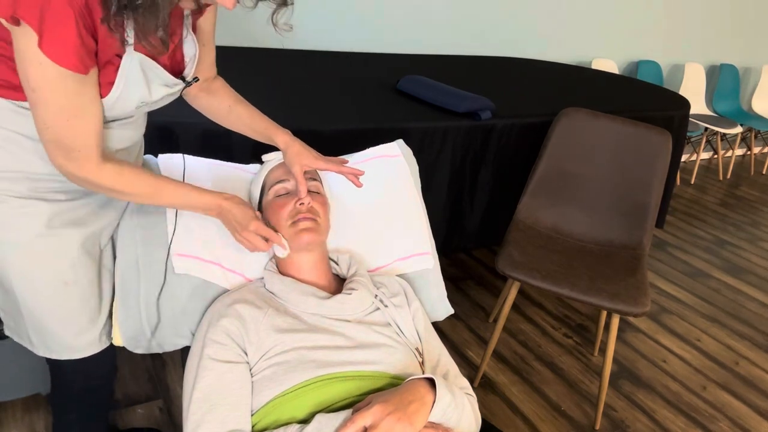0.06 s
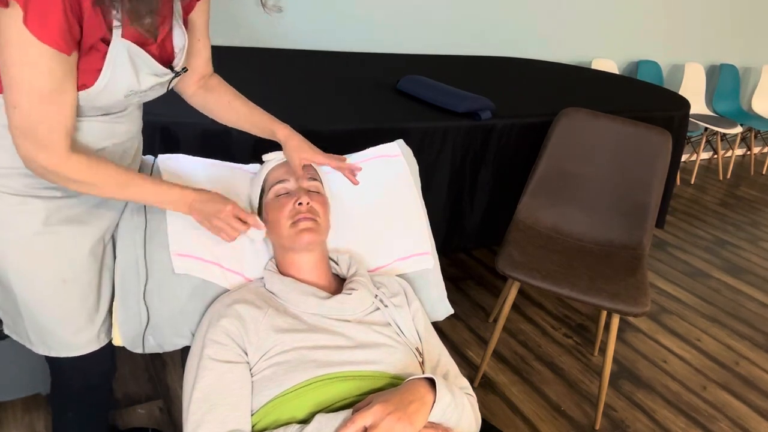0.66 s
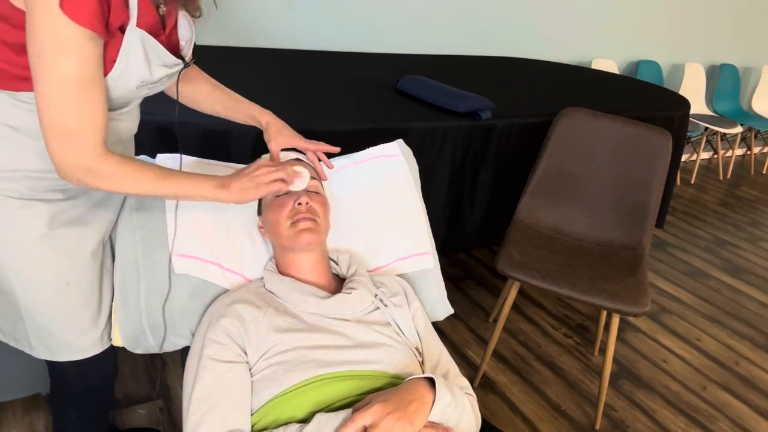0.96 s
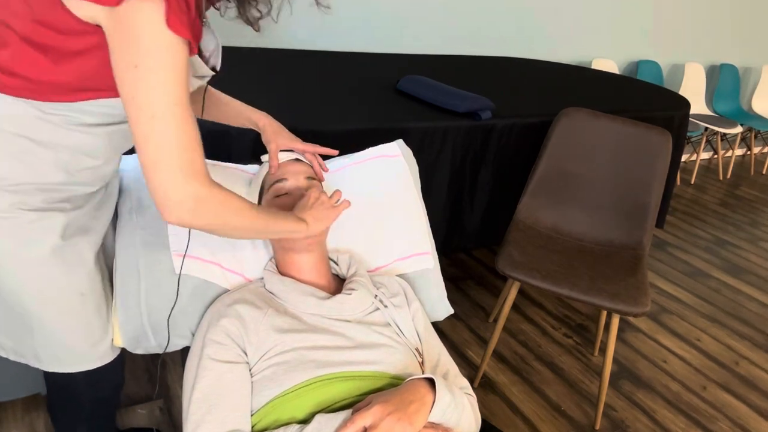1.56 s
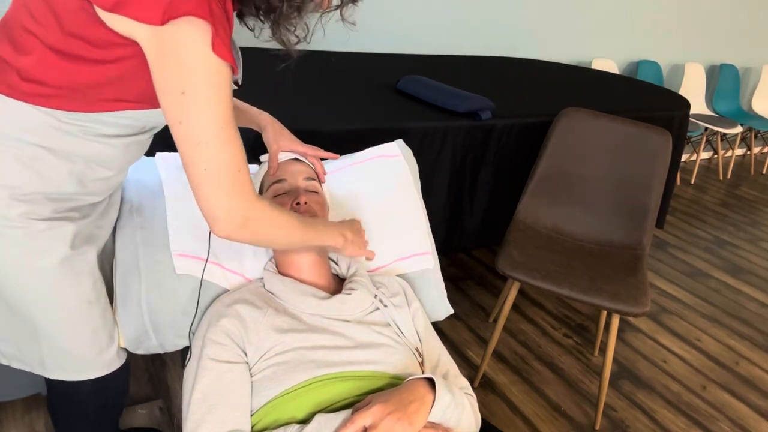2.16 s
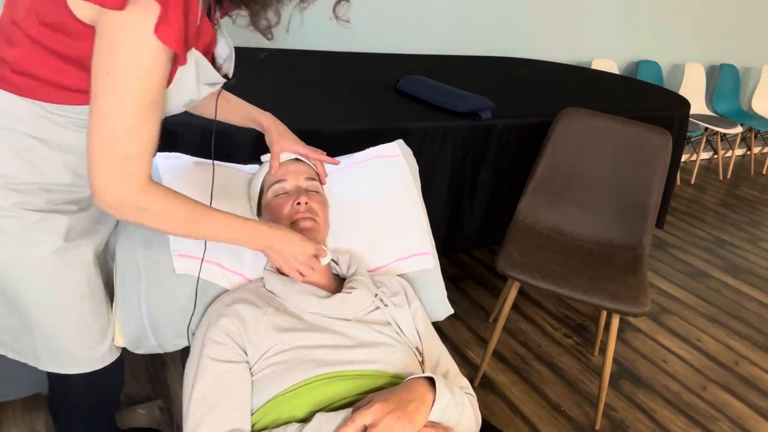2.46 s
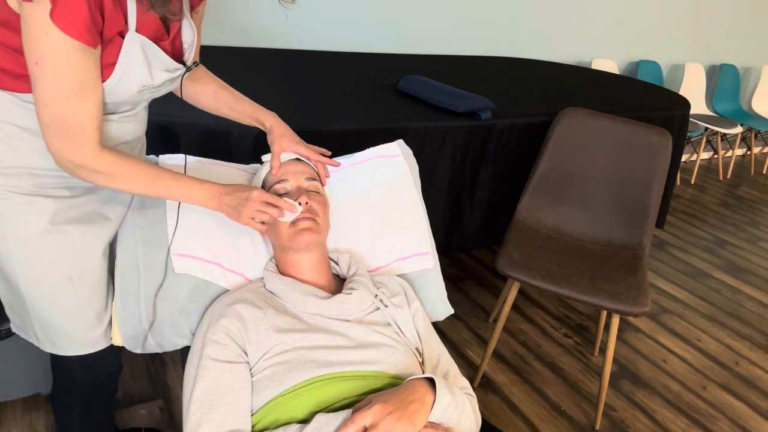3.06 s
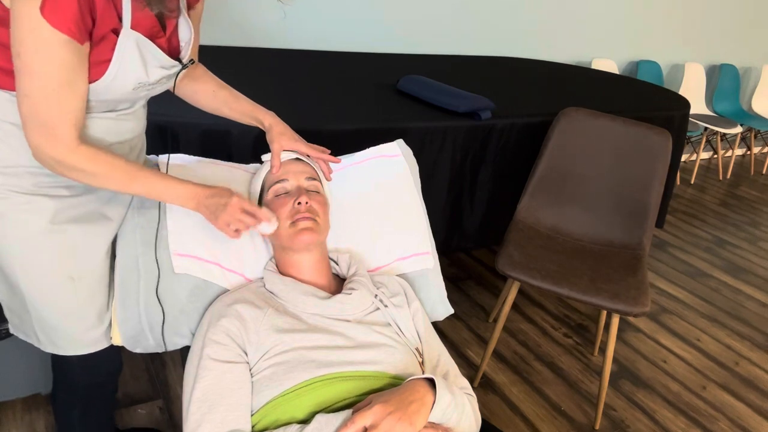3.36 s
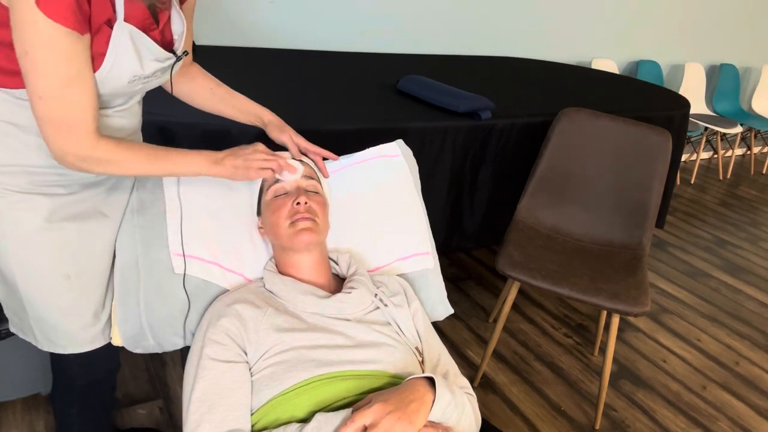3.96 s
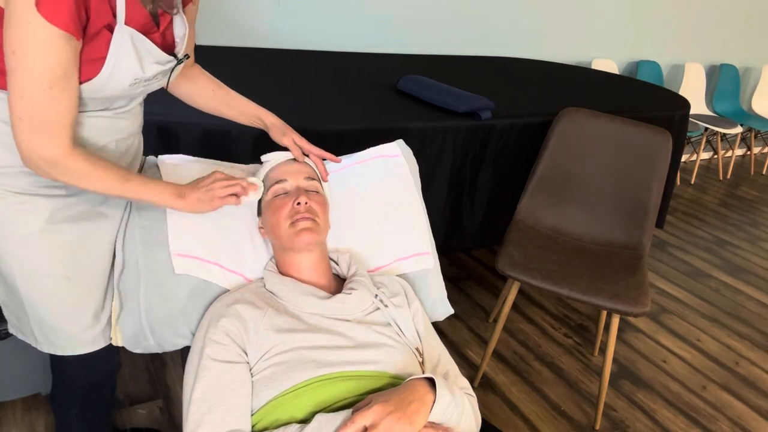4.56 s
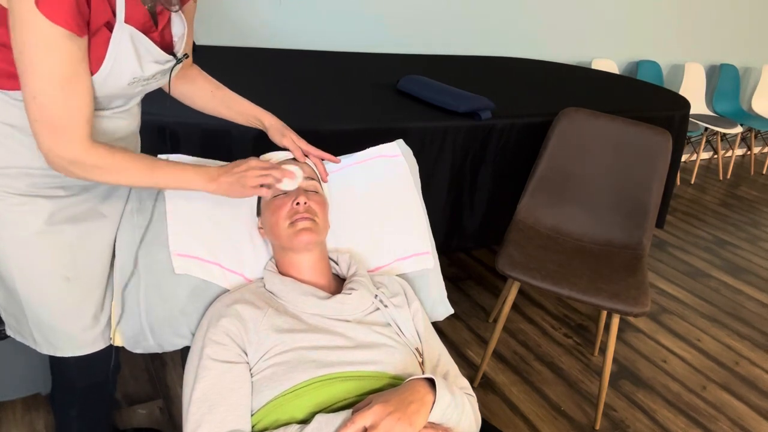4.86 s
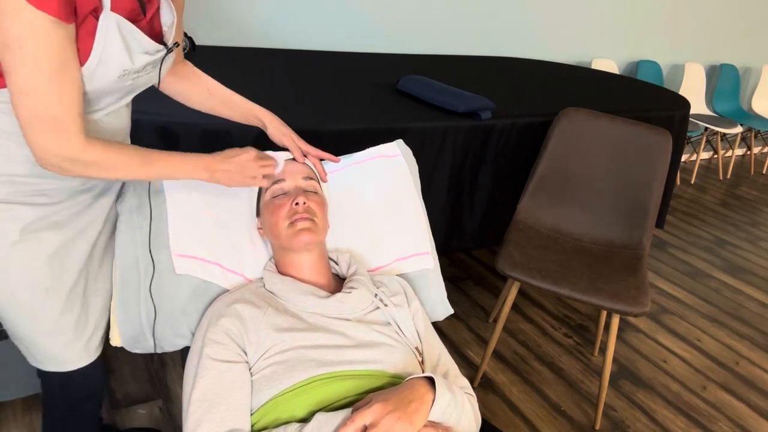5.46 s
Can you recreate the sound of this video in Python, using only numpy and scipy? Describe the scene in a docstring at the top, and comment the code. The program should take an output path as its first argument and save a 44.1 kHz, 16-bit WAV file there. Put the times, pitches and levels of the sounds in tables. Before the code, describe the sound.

Light, airy swishes of cotton rubbing a face, with tiny rasps, deep microphone bumps and faint ventilation.

```python
"""A cotton pad wipes a face in short, light strokes, close up in a quiet room.
Its fibres hiss on the skin, and now and then snag and let go with a tiny rasp.
As the arm moves, a sleeve rustles, handling ticks, and a microphone worn on the apron
rumbles and bumps. Ventilation hums faintly behind."""
import sys
import numpy as np
from scipy import signal
from scipy.fft import rfft, irfft
from scipy.io import wavfile
from scipy.ndimage import uniform_filter1d

SR = 44100
rng = np.random.default_rng(int(sys.argv[2]) if len(sys.argv) > 2 else 0)


def int16_out(signal):
    """Quantize to a 16-bit WAV file."""
    q = np.round(np.clip(np.atleast_2d(signal).T, -1, 1) * 32767)
    wavfile.write(sys.argv[1], SR, q.astype(np.int16))


N = 242882
TIME = np.arange(N) / SR
BIN_HZ = np.fft.rfftfreq(N, 1 / SR)


def gain_of(db):
    """Decibels to amplitude."""
    return 10 ** (np.asarray(db) / 20)


def unit_rms(x):
    """Scales to rms 1."""
    return x / np.sqrt(np.mean(x ** 2) + 1e-20)


def fader(curve):
    """Rows of (time_s, level_db) as a gain for every sample."""
    return gain_of(np.interp(TIME, *np.transpose(curve)))


def swell(peak_s, level_db, half_width_s):
    """A bell-shaped rise and fall in gain."""
    return gain_of(level_db) * np.exp(-((TIME - peak_s) / half_width_s) ** 2 / 2)


def coloured(x, eq, focus=1):
    """Shapes x with an EQ curve and an optional weight per frequency, at rms 1."""
    hz, db = np.transpose(eq)
    response = gain_of(np.interp(np.log(BIN_HZ + 1), np.log(hz + 1), db))
    return unit_rms(irfft(rfft(x) * focus * response, N))


def noise():
    """White noise."""
    return rng.standard_normal(N)


def drift(rate_hz):
    """A slow random wander, rms 1, up to about this rate."""
    return unit_rms(irfft(rfft(noise()) * np.exp(-(BIN_HZ / rate_hz) ** 2), N))


def fuzzy_tone(pitch_hz, width_hz):
    """Noise in one narrow resonance."""
    return unit_rms(irfft(rfft(noise()) / (1 + ((BIN_HZ - pitch_hz) / width_hz * 1.24) ** 2), N))


def grainy_noise(per_s, share):
    """Smooth noise with this share of its power in separate random grains."""
    grains = unit_rms(noise() * (rng.random(N) < per_s / SR))
    return np.sqrt(share) * grains + np.sqrt(1 - share) * noise()


def bursts(rows, eq, fall_s):
    """Brief clumps of slips that swell and die, each strongest around its own pitch."""
    out = np.zeros(N)
    for peak_s, level_db, rise_s, pitch_hz, spread_octaves in rows:
        from_peak = np.maximum((peak_s - TIME) / rise_s, (TIME - peak_s) / fall_s)
        envelope = np.exp(-from_peak ** 1.5)
        phases = np.angle(rfft(envelope * noise()))
        slips = irfft(np.exp(1j * phases), N)  # a flat spectrum: soft stuff does not ring
        focus = 1 / np.sqrt(1 + (np.log2((BIN_HZ + 1) / pitch_hz) / spread_octaves) ** 2)
        burst = coloured(slips * envelope ** (1 / 8), eq, focus)
        out += gain_of(level_db) * np.sqrt(np.mean(envelope ** 2)) * burst
    return out


# Room tone, deep with a thin hiss on top: frequency_hz, gain_db
AIR_EQ = [(10, -9), (45, 7.5), (88, -3), (120, -4.5), (165, -14), (300, -20), (550, -28), (900, -31.5),
          (2500, -36), (4000, -35.5), (5200, -34.5), (8000, -37.5), (10500, -42.5), (14500, -35.5),
          (16000, -46)]
# A faint, narrow whine fades in: time_s, level_db
WHINE_FADER = [(0, -110), (2.1, -88), (2.9, -83), (5.51, -81.5)]

def room():
    """Ventilation air, a steady low drone, a faint hum that swells once and a wavering whine."""
    # in the drone's band, a low cloth rumble swells as the arm reaches across
    cloth_swell = swell(peak_s=2.34, level_db=-61, half_width_s=0.44)
    drone_and_cloth = (gain_of(-59.5) + cloth_swell) * fuzzy_tone(pitch_hz=90, width_hz=26)
    hum_gain = gain_of(-86) + swell(peak_s=5.23, level_db=-75.5, half_width_s=0.12)
    hum = hum_gain * fuzzy_tone(pitch_hz=525, width_hz=36)
    waver = gain_of(drift(rate_hz=7.3))
    whine = fader(WHINE_FADER) * waver * fuzzy_tone(pitch_hz=1632, width_hz=56)
    air = gain_of(-57) * coloured(noise(), AIR_EQ)
    return air + drone_and_cloth + hum + whine


# Sub-bass of the rocking microphone: frequency_hz, gain_db
RUMBLE_EQ = [(4, -16.5), (12, 9), (22, -3), (42, -3), (55, -10.5), (70, -22), (110, -31.5), (200, -43),
             (500, -65.5), (2000, -100)]
# Body sway before the trim, calmest while the arm reaches across: time_s, level_db
SWAY_FADER = [(0, -35), (.48, -34.5), (.6, -29), (.78, -42.5), (.9, -40.5), (1.1, -34), (1.45, -48),
              (1.67, -40), (1.85, -47), (2.48, -48.5), (2.54, -33.5), (3.15, -35), (3.4, -29.5),
              (3.58, -38), (4.35, -34.5), (4.85, -37), (5.51, -32.5)]

def microphone_rumble(trim_db=-1, compression=0.75):
    """The worn microphone rocks to and fro in soft jolts, as widely as the body moves."""
    jolts = coloured(grainy_noise(per_s=32, share=0.8), RUMBLE_EQ)
    power = uniform_filter1d(np.abs(signal.hilbert(jolts)) ** 2, size=4000)
    envelope = uniform_filter1d(np.sqrt(np.abs(power)), size=1500)
    rocking = unit_rms(jolts / envelope ** compression)  # evens out the strength of the jolts
    soft_ends = signal.windows.tukey(N, 0.004)
    return gain_of(trim_db) * fader(SWAY_FADER) * rocking * soft_ends


# The deepest thumps of the apron: peak_s, level_db, half_width_s
APRON_SHOVES = [(0.58, -22, 0.008), (0.631, -24, 0.0097), (.898, -27, 0.011), (2.537, -31.5, 0.0042),
                (2.713, -31.5, 0.0091), (3.101, -27.5, 0.014), (3.296, -21.5, 0.0165), (3.368, -24, 0.0081),
                (3.453, -21.5, 0.01), (3.756, -25.5, 0.0124), (4.368, -25, 0.011), (4.731, -23.5, 0.016),
                (5.425, -24.5, .013)]

def apron_shoves():
    """Each shove of the apron presses the air at the microphone once and springs back."""
    out = np.zeros(N)
    for peak_s, level_db, half_width_s in APRON_SHOVES:
        from_peak = (TIME - peak_s) / half_width_s
        out -= gain_of(level_db) * (1 - from_peak ** 2) * np.exp(-from_peak ** 2 / 2)
    return out


# Muffled body of a knock: frequency_hz, gain_db
BUMP_EQ = [(20, -13), (70, 5), (300, 5.5), (700, -1), (2000, -21), (6000, -65)]
# Cloth knocks: peak_s, level_db, rise_s, pitch_hz, spread_octaves
CLOTH_BUMPS = [(.445, -45.5, .0025, 170, .3), (2.538, -49, .005, 170, .35), (2.68, -53.5, .006, 246, .65)]

def cloth_bumps():
    """Cloth knocks dully against the microphone."""
    return bursts(CLOTH_BUMPS, BUMP_EQ, fall_s=0.003)


# Soft, dark rustle of cloth: frequency_hz, gain_db
SLEEVE_EQ = [(80, -11.5), (200, 0.5), (400, -3.5), (600, -3.5), (850, -11), (1500, -17.5), (3000, -18),
             (8000, -31.5), (16000, -35)]
# Reaches of the arm: peak_s, level_db, half_width_s
ARM_REACHES = [(.3, -77, 0.17), (1.85, -77, .06), (2.386, -69.5, 0.094), (2.6, -69.5, .1),
               (2.786, -66.5, 0.057), (3.35, -80, 0.14), (3.78, -69.5, 0.068), (5.5, -67.5, 0.13)]

def sleeve(rest_db=-76.5, crumple_db=2):
    """The sleeve never quite lies still, and brushes louder with each reach of the arm."""
    movement = np.sqrt(gain_of(rest_db) ** 2 + sum(swell(*reach) ** 2 for reach in ARM_REACHES))
    crumple = gain_of(crumple_db * drift(rate_hz=12.5))
    return movement * crumple * coloured(grainy_noise(per_s=500, share=0.27), SLEEVE_EQ)


# Dry midrange of a tick: frequency_hz, gain_db
TICK_EQ = [(100, -20), (600, 5.5), (2500, -0.5), (5500, -12.5), (8500, -8), (12000, -13), (16000, -34)]
# Handling ticks: peak_s, level_db, rise_s, pitch_hz, spread_octaves
HANDLING_TICKS = [(.151, -55, .0034, 3000, 2.4), (2.679, -55.5, .0036, 2200, 3),
                  (5.005, -60.5, .005, 2600, .13)]

def handling_ticks():
    """Handling makes small, dry ticks that die without ringing."""
    return bursts(HANDLING_TICKS, TICK_EQ, fall_s=0.003)


# Bright rasp of a snag: frequency_hz, gain_db
RASP_EQ = [(1000, -9), (2500, -20.5), (3500, -2), (5200, 3), (6600, -2), (7900, 1.5), (9500, -7.5),
           (12000, -28), (16000, -27)]
# Snags on the skin: peak_s, level_db, rise_s, pitch_hz, spread_octaves
FIBRE_SNAGS = [(.4925, -40.5, 0.0056, 6140, 0.33), (1.077, -55.5, 0.0074, 4630, 0.26),
               (1.637, -54, 0.0042, 6100, 0.46), (2.537, -65, 0.0044, 5260, 0.77),
               (2.602, -59, 0.0037, 5430, 0.33), (3.329, -62.5, 0.007, 4060, 0.6),
               (3.45, -63.5, .004, 6000, .7), (3.9605, -37, 0.0022, 4760, 0.25),
               (3.972, -51.5, 0.0056, 5230, 0.42), (5.047, -57, 0.011, 5140, 0.78)]

def fibre_snags():
    """Cotton fibres catch on the skin and let go with a tiny rasp."""
    return bursts(FIBRE_SNAGS, RASP_EQ, fall_s=0.004)


def glide(start_s, end_s, ease_s=0.027):
    """Speed of the hand through one move, 0-1: it eases in and eases out."""
    ramp = np.clip(np.minimum(TIME - start_s, end_s - TIME) / ease_s, 0, 1)
    return np.sin(np.pi / 2 * ramp) ** 2


# Airy hiss of cotton on skin: frequency_hz, gain_db
COTTON_EQ = [(1500, -17), (2900, -17.5), (3500, -8), (4300, -4), (5200, 0.5), (6000, -2.5), (6700, -5.5),
             (7800, 1), (8700, -1.5), (9600, -7.5), (11000, -12.5), (13000, -20.5), (16000, -43)]
# Hand pressure, heard as the hiss at full speed before the trim: time_s, level_db
PRESSURE_FADER = [(0, -60), (.25, -68), (.42, -59), (.56, -62), (1.0, -67), (1.65, -78.5), (2.42, -79.5),
                  (2.58, -68.5), (2.83, -67), (2.91, -62), (3.05, -66), (3.3, -63.5), (3.75, -70),
                  (3.82, -60.5), (3.9, -66), (4.28, -67), (4.34, -60.5), (4.44, -63.5), (4.74, -60.5),
                  (4.87, -65.5), (5.35, -66.5), (5.47, -72.5)]
# One row per touch of the pad, rubbed to and fro: land_s, turn_s (none or several), lift_s
PAD_TOUCHES = [(-.04, 0.043, 0.085), (.138, .2, .303, .362, .435, .53, .588), (.59, .688, .752, .892),
               (0.907, .984, 1.042, 1.09), (1.64, 1.79), (1.895, 1.97, 2.05, 2.14), (2.28, 2.465),
               (2.526, 2.679, 2.802, 2.871, 2.973), (2.978, 3.052, 3.192, 3.273, 3.353, 3.428, 3.474),
               (3.495, 3.545), (3.648, 3.703, 3.783, 3.875, 4.077, 4.143), (4.16, 4.207, 4.315),
               (4.322, 4.393, 4.585, 4.685, 4.809, 4.898), (5.018, 5.073, 5.154, 5.209, 5.303),
               (5.31, 5.411, 6.5)]

def cotton_pad(turn_speed=0.14, speed_exponent=0.98, flutter_db=0.92, trim_db=-0.48):
    """Countless fibre slips merge into a hiss that follows the hand and dips at each turn."""
    speed = np.zeros(N)
    for touch in PAD_TOUCHES:
        strokes = sum(glide(start_s, end_s) for start_s, end_s in zip(touch, touch[1:]))
        speed += turn_speed * glide(touch[0], touch[-1]) + (1 - turn_speed) * strokes
    grip = gain_of(trim_db + flutter_db * drift(rate_hz=59))  # the skin drags unevenly
    hiss = coloured(grainy_noise(per_s=1100, share=0.37), COTTON_EQ)
    return fader(PRESSURE_FADER) * speed ** speed_exponent * grip * hiss


def scene():
    """A close, dry mono mix of the pad, the moving body and the room."""
    pad = cotton_pad() + fibre_snags()
    handling = handling_ticks() + cloth_bumps() + sleeve()
    return (pad + handling + microphone_rumble() + apron_shoves() + room())[None]


def record(dry):
    """A steep low-pass takes off the very top of the treble."""
    low_pass = signal.firwin(511, cutoff=15900, window=("kaiser", 9), fs=SR)
    return signal.oaconvolve(dry, low_pass[None], "same")


dry = scene()
out = record(dry)
int16_out(out)
```